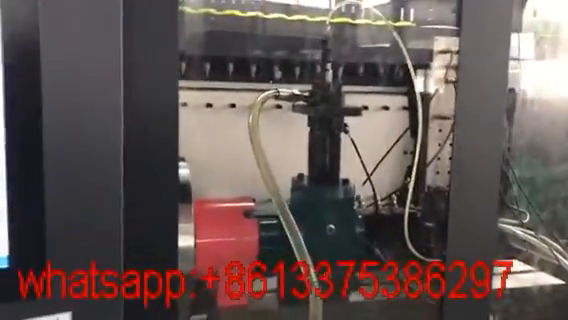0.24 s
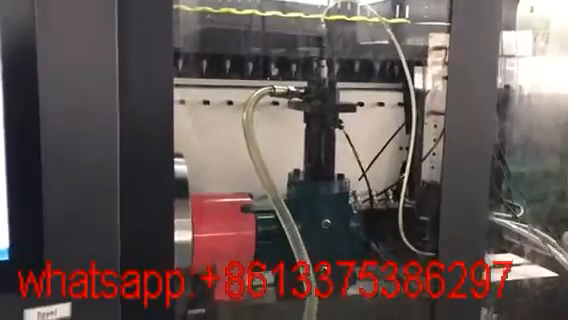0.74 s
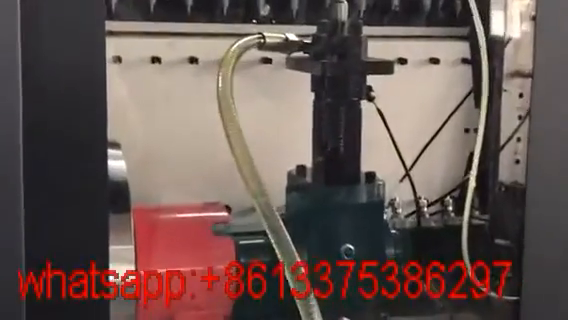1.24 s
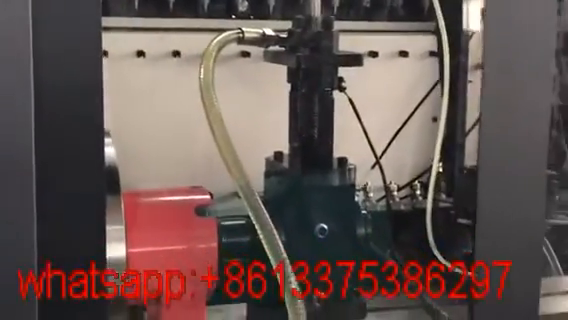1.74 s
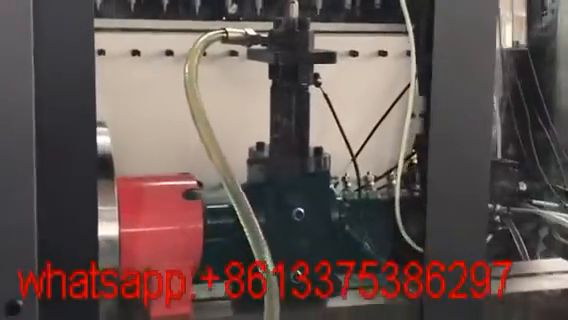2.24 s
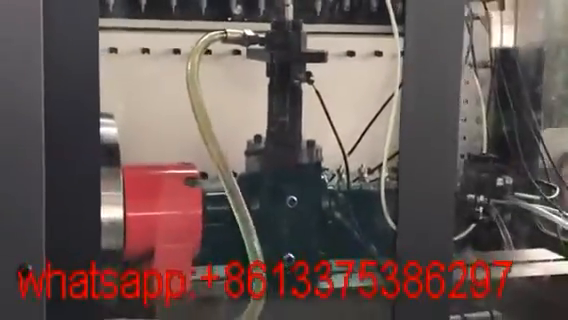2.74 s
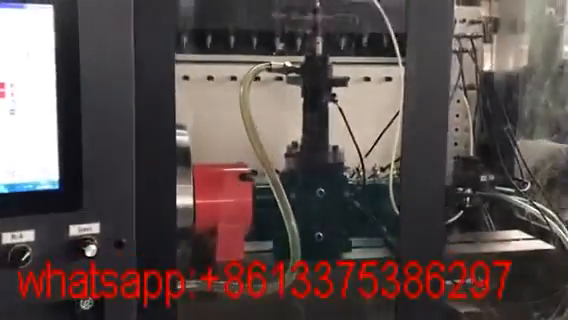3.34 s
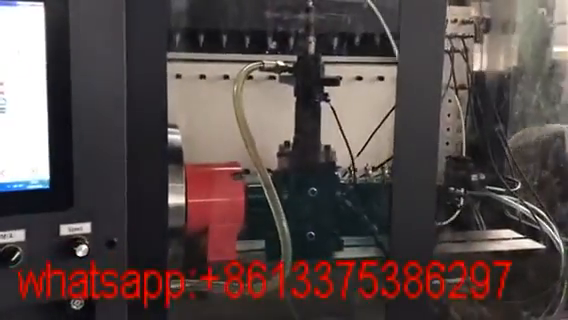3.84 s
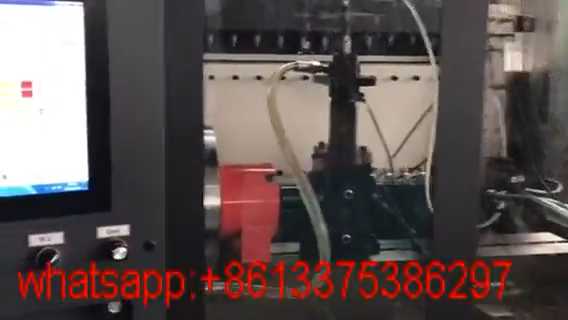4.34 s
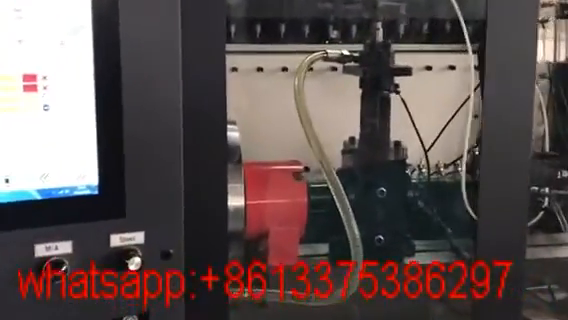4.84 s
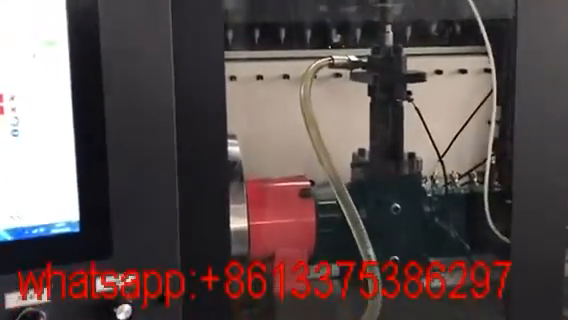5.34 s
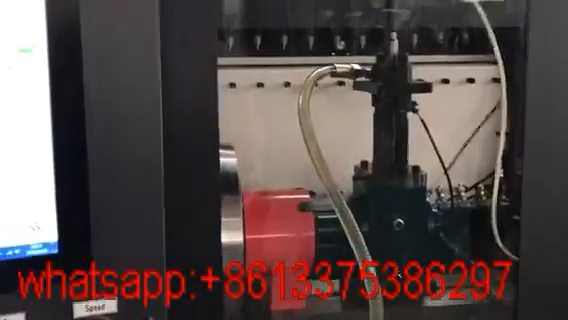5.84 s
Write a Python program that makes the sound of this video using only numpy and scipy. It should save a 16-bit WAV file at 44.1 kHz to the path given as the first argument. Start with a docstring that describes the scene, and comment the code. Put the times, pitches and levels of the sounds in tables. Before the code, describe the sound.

A diesel injection pump chugs fast and evenly on a test bench, then takes load after a second and knocks with loud, hard metallic blows.

```python
"""A single-plunger diesel injection pump turns at a steady speed on a test bench, heard from a step away.
Every cam turn shoves the frame (cam harmonics), rattles the tappet and spits oil (noise swelling once a turn).
After a second the pump takes load: each stroke is a run of impulses that rings casting and cabinet modes.
Gears, oil and rumble are coloured noise; the drive whine and valve whistle are wavering sines.
Later the oil valve shifts: a slightly lower whistle joins in. Two low bumps and short rushes of hiss pass."""
import sys
import numpy as np
from scipy import signal
from scipy.fft import rfft, irfft, next_fast_len
from scipy.io import wavfile
from scipy.ndimage import map_coordinates

SR = 44100
rng = np.random.default_rng(int(sys.argv[2]) if len(sys.argv) > 2 else 0)


def dump(signal):
    """Clip the signal to [-1, 1] and save it as 16-bit WAV at the path in sys.argv[1]."""
    limited = np.clip(np.atleast_2d(signal).T, -1, 1)
    pcm = np.round(limited * 32767).astype(np.int16)
    wavfile.write(sys.argv[1], SR, pcm)


N = 267673  # length [samples]

TURN_HZ, FIRST_TURN_S = 12.7267, .0345  # cam speed and start of the first turn
LOAD_ON_S, VALVE_SHIFT_S = 1.04, 2.32  # the pump takes load; the oil valve shifts
TOP_HZ = 15850  # band limit of the microphone

# single harder strokes: (time [s], level above the settled force [dB])
HARD_STROKES = [(5.063, 3), (5.378, 4)]
# settled force, extra force of the first strokes, its decay time, random spread
FORCE_DB, OVERSHOOT_DB, SETTLE_S, UNEVEN_DB = -1.58, 2.9, .6, 0.33


def stroke_force():
    """The first loaded strokes overshoot and settle; returns (time [s], level [dB]) rows."""
    times = turns()[turns() > LOAD_ON_S]
    overshoot_db = OVERSHOOT_DB * np.exp(-(times - LOAD_ON_S) / SETTLE_S)
    force_db = FORCE_DB + overshoot_db + UNEVEN_DB * rng.standard_normal(len(times))
    for s, extra_db in HARD_STROKES:
        nearest = np.argmin(np.abs(times - s))
        force_db[nearest] = FORCE_DB + extra_db
    return np.column_stack([times, force_db])


# contacts within one loaded stroke: (time into the turn [ms], relative level [dB])
STROKE_CONTACTS = [(5.04, -4.6), (12.33, -.6), (15.58, .9), (22.43, -6.4)]
# modes of the pump casting: (frequency [Hz], relative level [dB], t60 [s])
CASTING_MODES = [(830, -16, .033), (902, -8, .04), (1039, 4, .035), (1366, -5.5, .032)]


def casting_knocks(strokes, level_db, scatter_db):
    """Each loaded stroke is a quick run of hard contacts that ring the casting."""
    times, force_db = strokes.T
    back = step_back(times)
    blows = np.zeros(N)
    for ms, db in STROKE_CONTACTS:
        late, size = rng.standard_normal((2, len(times)))
        contact_times = times + (ms + .04 * late) / 1000
        # a step back costs 1.5 dB
        blows += taps(contact_times, amp(force_db) * amp(db - 1.5 * back + scatter_db * size))
    response = sum(amp(db) * mode(hz, t60) for hz, db, t60 in CASTING_MODES)
    casting = amp(level_db) * ring(blows, response)
    # the small casting radiates little bass
    return signal.sosfiltfilt(signal.butter(3, 500, "high", fs=SR, output="sos"), casting)


# modes of the cabinet panels: (frequency [Hz], relative level [dB], t60 [s], level change a step back [dB])
PANEL_MODES = [(577, -3.5, .24, 0), (712, -9, .17, 0), (761, 3.5, .24, -1), (830, 3, .2, 0),
               (883, -6, .19, 0), (979, 1.8, .2, -2), (1026, 15, .16, -3), (1048.7, 5.7, .2, -2),
               (1159, -3, .23, 7), (1206, -5.4, .21, 4), (1229, -2, .2, 1)]


def cabinet_panels(strokes, level_db, scatter_db):
    """The stroke reaches the panels about 16 ms into the turn; they ring on between strokes."""
    times, force_db = strokes.T
    back = step_back(times)
    panels = np.zeros(N)
    for k, (hz, db, t60, change_db) in enumerate(PANEL_MODES):
        # stepping back moves the listener through each panel's standing waves
        scatter = scatter_db * rng.standard_normal(len(times))
        sizes = amp(force_db) * amp(db + change_db * back + scatter)
        # neighbouring modes swing against each other
        panels += (-1) ** k * ring(taps(times + .01588, sizes), mode(hz, t60))
    return amp(level_db) * panels


def knocks(strokes, casting_db, cabinet_db, echo_db, scatter_db):
    """Casting and cabinet ring at each loaded stroke; dense reflections follow the casting."""
    casting = casting_knocks(strokes, casting_db, scatter_db)
    echo = amp(echo_db) * ring(casting, tail(t60=0.88))
    return casting + cabinet_panels(strokes, cabinet_db, scatter_db) + echo


# colour of the tappet rattle: (frequency [Hz], relative level per Hz [dB])
RATTLE_COLOUR = [(300, -31), (620, -27), (800, -0.5), (1030, 1), (1400, -2), (1630, -5.5), (1900, -5.5),
                 (2300, -7), (2700, -14), (3400, -12.5), (5000, -21.5), (12000, -52)]


def tappet(level_db, grain_db, step_db):
    """The tappet rattles at the top of every lift; it carries better to a listener a step back."""
    swell = bursts(start_ms=1, rise_ms=17, t60=.125, scatter_db=.7)
    clatter = machine_noise(repeat=0.52) * amp(grain_db * wobble(700)) * swell
    rattle = colour(steel(clatter, ring_db=-0.5, t60=0.14), RATTLE_COLOUR)
    return amp(level_db + step_db * step_back(clock())) * rattle


# relative levels of the cam's force on the frame: (multiple of the cam speed, relative level [dB])
FRAME_ORDERS = [(1, -44), (2, -64), (3, -56), (4, -29), (5, -36), (6, -13), (7, -23), (8, -26.5), (9, -3.5),
                (10, -10.5), (11, -8), (12, 1), (13, -6), (14, -12.5), (15, -15), (16, -27), (17, -1.5),
                (18, -5), (19, -11), (20, -2), (21, -11.5), (22, -5.5), (23, -12.5), (24, -43), (25, -8.5),
                (26, -4.5), (27, -30), (28, -6.5), (29, -6.5), (30, -3), (31, -5), (32, -18.5), (33, -11.5),
                (34, -26)]


def frame(level_db, shove_ms):
    """The cam shoves the frame once a turn; each order arrives with its own lag."""
    angle = 2 * np.pi * TURN_HZ * (clock() - FIRST_TURN_S - shove_ms / 1000)
    shake = sum(amp(db) * np.cos(round(order) * angle + rng.uniform(-1.6, 1.6)) for order, db in FRAME_ORDERS)
    return amp(level_db) * unit(shake)


# colour of the oil spray: (frequency [Hz], relative level per Hz [dB])
SPRAY_COLOUR = [(1500, -12), (3000, -4), (4100, 3.5), (5000, -4.5), (6000, 0.5), (7100, 0.5), (7700, -7.5),
                (9200, -7.5), (10400, -13), (11300, -9.5), (13000, -11), (15800, -17.5)]


def spray(level_db, grain_db, steel_db):
    """Oil spits through the nozzle at every stroke and rings the many small modes of the steel parts."""
    swell = bursts(start_ms=0.34, rise_ms=10.0, t60=0.17, scatter_db=2)
    jet = machine_noise(repeat=0.37) * amp(grain_db * wobble(1300)) * swell
    snap = rng.standard_normal(N) * bursts(start_ms=2.8, rise_ms=2.8, t60=0.013, scatter_db=0.5)
    ringing = unit(ring(snap, tail(t60=0.16)))
    return amp(level_db) * nearness(step_db=2.2) * colour(unit(jet) + amp(steel_db) * ringing, SPRAY_COLOUR)


# colour of the loose clatter: (frequency [Hz], relative level per Hz [dB])
SHUDDER_COLOUR = [(300, -18), (640, -3), (750, -0.5), (900, 7), (1060, -8.5), (1200, 0.5), (1550, -29),
                  (1750, -5.5), (2300, -7.5), (2600, -9), (3000, -28), (6000, -35)]


def shudder(strokes, level_db, grain_db):
    """Pipes and guards clatter loosely after each loaded stroke, more after a hard one."""
    force_db = curve(strokes, clock())
    clatter = machine_noise(repeat=0.49) * amp(grain_db * wobble(500) + 0.61 * force_db)
    swell = bursts(start_ms=4, rise_ms=10, t60=.15, scatter_db=1)
    return amp(level_db) * colour(clatter * swell * load(), SHUDDER_COLOUR)


# ring of the tappet spring: (frequency [Hz], relative level [dB], t60 [s])
SPRING_MODES = [(1760, 0, .1), (1950, -3, .04), (2200, -4, .07), (2330, -4, .04), (2560, -3, .03),
                (2900, 1, .04), (3150, 0, .04)]


def spring(level_db, load_db):
    """The tappet spring is shaken at every lift and rings freely at idle; load damps it."""
    shake = machine_noise(repeat=0.17) * bursts(start_ms=9.1, rise_ms=12, t60=0.052, scatter_db=0.5)
    coils = ring(shake, sum(amp(db) * mode(hz, t60) for hz, db, t60 in SPRING_MODES))
    return amp(level_db + load_db * load()) * unit(coils)


# colour of the gears: (frequency [Hz], relative level per Hz [dB])
GEARS_COLOUR = [(260, -46), (450, -12), (488, -7.5), (647, -10.5), (791, -11.5), (930, -1), (1050, 7),
                (1140, -1), (1480, -1), (1590, -4), (1790, -12.5), (1980, -6), (5000, -32.5), (6500, -48),
                (11000, -120)]


def gears(level_db):
    """Gears run without a break: partly repeating noise that rings small steel modes."""
    return amp(level_db) * colour(steel(machine_noise(repeat=0.32), ring_db=0.5, t60=0.2), GEARS_COLOUR)


# tones of the drive: (frequency [Hz], rms level at idle [dB], level change under load [dB])
DRIVE_TONES = [(102, -40, -12), (114.5, -41, -11), (216.5, -44, -10), (305.5, -41, -12), (407, -43, -12),
               (420, -41, -11), (433, -43, -12), (548, -47, 1), (647, -40, -9), (947.5, -32.5, -4.5),
               (1018, -37, -4), (1044, -40, -5), (1069, -37, -6), (1172, -41, -4), (1271, -39, -6),
               (1335, -40, -7), (1490, -43, -3), (1746, -45, -7), (1873, -47, -6)]


def drive_whine():
    """The drive hums and whines in steady lines that waver; most weaken under load."""
    return sum(tone(hz, db + change_db * load(), drift_hz=1.59, flutter_db=1.5)
               for hz, db, change_db in DRIVE_TONES)


# whistles of the oil valve: (frequency [Hz], relative rms level [dB], level change after the shift [dB])
VALVE_TONES = [(6076, -75, 26), (6126, -75.5, 25), (6240, -50, 1), (6331, -49.5, -3), (7210, -56, -1),
               (8140, -59, -1), (12785, -64, -2)]


def valve_whistle(level_db, wander_db, wanders_per_s):
    """The valve whistles at a slowly wandering level; its shift brings in a lower pair of lines."""
    whistle = sum(tone(hz, db + change_db * valve_shift(), drift_hz=12, flutter_db=2.5)
                  for hz, db, change_db in VALVE_TONES)
    return amp(level_db + wander_db * wobble(wanders_per_s)) * whistle


# colour of the circulating oil: (frequency [Hz], relative level per Hz [dB])
OIL_COLOUR = [(1760, -5.5), (3000, -1.5), (4070, -1), (4940, -9), (5790, -4.5), (6040, -18), (6290, -5),
              (6520, -5), (7080, 0.5), (7750, -8), (9280, -8.5), (10400, -17), (12900, -15), (15200, -29),
              (15700, -33)]


def circulating_oil(level_db, shift_db):
    """Oil hisses without a break and rings small steel modes; the valve shift weakens it."""
    hiss = colour(steel(machine_noise(repeat=0.29), ring_db=-2.0, t60=0.18), OIL_COLOUR)
    return amp(level_db + shift_db * valve_shift() + .5 * wobble(3.06)) * hiss


# colour of the motor rumble: (frequency [Hz], relative level per Hz [dB])
RUMBLE_COLOUR = [(20, -36), (45, -31), (65, -9), (95, -14), (170, 1), (300, -9), (420, -8.5), (470, -10),
                 (650, -9), (1200, -8), (4000, -48)]


def motor_rumble(level_db):
    """The motor rumbles as low noise of gently wandering level."""
    return amp(level_db + wobble(5.65)) * colour(rng.standard_normal(N), RUMBLE_COLOUR)


# dull bumps on the bench: (time [s], relative level [dB], frequency [Hz])
BENCH_BUMPS = [(4.905, -19, 135), (5.344, -16.5, 105)]


def bumps():
    """A soft push, 5 ms long, sets off one low resonance."""
    out = np.zeros(N)
    push = np.hanning(SR // 200)
    for s, db, hz in BENCH_BUMPS:
        thud = np.convolve(mode(hz, t60=0.2), push / push.sum())
        out += amp(db) * ring(taps(np.array([s]), [1.]), thud)
    return out


# brief rushes of hiss: (time of the peak [s], peak level [dB], time to fall to 1/e [s], centre [Hz])
HISS_RUSHES = [(4.01, -26.5, 0.018, 4950), (4.052, -32, 0.04, 4900), (5.16, -45, 0.055, 13000)]


def rushes():
    """Band-shaped noise swells and fades in a short bell curve."""
    t, out = clock(), np.zeros(N)
    for s, db, length, hz in HISS_RUSHES:
        band = [(hz / 8, -12), (hz / 2, 3), (hz, 0), (hz * 2, -9), (hz * 3, -22)]
        hiss = colour(rng.standard_normal(N), band)
        out += amp(db) * np.exp(-((t - s) / length) ** 2) * hiss
    return out


# where the listener stands: (time [s], position [steps back; negative leans in])
LISTENER_STANCE = [(1.1, -0.28), (2.25, -0.22), (2.9, 1), (4, 1), (4.8, 0.45), (5.4, -0.13), (6, -0.37)]


def step_back(at):
    """How far back the listener stands at the given times."""
    return curve(LISTENER_STANCE, at)


def nearness(step_db):
    """Direct treble falls as the listener steps back."""
    return amp(-step_db * step_back(clock()))


def load():
    """0 while the pump idles, 1 once it delivers."""
    return np.clip((clock() - LOAD_ON_S) / .02, 0, 1)


def valve_shift():
    """0 before the oil valve shifts, 1 after."""
    return np.clip((clock() - VALVE_SHIFT_S) / .02, 0, 1)


def turns():
    """The start of every cam turn."""
    return np.arange(FIRST_TURN_S, N / SR, 1 / TURN_HZ)


def machine_noise(repeat):
    """Noise of which a share of the power comes back alike on every turn."""
    share = np.clip(repeat, 0, 1)
    pattern = np.resize(rng.standard_normal(round(SR / TURN_HZ)), N)
    return np.sqrt(share) * pattern + np.sqrt(1 - share) * rng.standard_normal(N)


def bursts(start_ms, rise_ms, t60, scatter_db):
    """An envelope that swells and dies once a turn, at rms 1."""
    t, times = np.arange(SR // 2) / SR, turns()
    power = np.clip(t * 1000 / rise_ms, 0, 1) ** 2 * np.exp(-2 * np.log(1000) * t / t60)
    sizes = amp(scatter_db * rng.standard_normal(len(times))) ** 2
    blows = taps(times + start_ms / 1000, sizes)
    # overlapping bursts add in power
    return unit(np.sqrt(np.abs(ring(blows, power))))


def tone(hz, db, drift_hz, flutter_db):
    """A line that wavers in pitch and level."""
    phase = 2 * np.pi * (np.cumsum(hz + drift_hz * wobble(25)) / SR + rng.random())
    return np.sqrt(2) * amp(db + flutter_db * wobble(13)) * np.sin(phase)


def steel(x, ring_db, t60):
    """x with the ring of many small steel modes on top, at rms 1."""
    return unit(unit(x) + amp(ring_db) * unit(ring(x, tail(t60))))


def mode(hz, t60):
    """One dying resonance; the air follows the speed of the surface."""
    t = np.arange(SR // 2) / SR
    decay = np.exp(-np.log(1000) * t / t60)
    onset = 1 - np.exp(-t / .001)
    swing = np.sin(2 * np.pi * hz * t) * decay * onset
    return np.gradient(swing) * SR / (2 * np.pi * hz)


def tail(t60):
    """Dense dying reflections of energy 1."""
    t = np.arange(SR // 2) / SR
    echo = rng.standard_normal(len(t)) * np.exp(-np.log(1000) * t / t60)
    return echo / np.linalg.norm(echo)


def ring(x, response):
    """x played through an impulse response."""
    return signal.fftconvolve(x, response)[:N]


def taps(times, sizes):
    """One impulse at each time."""
    return np.bincount(np.round(np.abs(times) * SR).astype(int), sizes, N)[:N]


def colour(x, points):
    """x shaped by (frequency [Hz], level [dB]) points, at rms 1."""
    size = next_fast_len(N + 8192)
    hz, db = np.transpose(points)
    log_hz = np.log(np.fft.rfftfreq(size, 1 / SR) + 1)
    gain = amp(np.interp(log_hz, np.log(hz), db))
    return unit(irfft(rfft(x, size) * gain, size)[:N])


def wobble(rate):
    """A smooth random curve, rate knots a second."""
    knots = rng.standard_normal(int(N * rate / SR) + 4)
    return map_coordinates(knots, [clock() * rate], mode="nearest")


def curve(rows, at):
    """(time [s], value) rows joined by straight lines."""
    return np.interp(at, *np.transpose(rows))


def clock():
    """The time of every sample in seconds."""
    return np.arange(N) / SR


def unit(x):
    """x at rms 1."""
    return x / np.sqrt(np.mean(x ** 2) + 1e-20)


def amp(db):
    """Decibels to gain."""
    return 10 ** (np.asarray(db) / 20)


def scene():
    """The pump on its running bench."""
    strokes = stroke_force()
    pump = knocks(strokes, casting_db=-8.0, cabinet_db=-26.0, echo_db=-17.5, scatter_db=.5)
    pump += tappet(level_db=-28.5, grain_db=1.5, step_db=1.1)
    pump += frame(level_db=-29.5, shove_ms=21)
    pump += spray(level_db=-36.5, grain_db=1, steel_db=-5.0)
    pump += shudder(strokes, level_db=-29.5, grain_db=0.5)
    pump += spring(level_db=-34.5, load_db=-5.5)
    bench = gears(level_db=-25.5) + drive_whine()
    bench += valve_whistle(level_db=1.5, wander_db=1.6, wanders_per_s=2.5)
    bench += circulating_oil(level_db=-35.5, shift_db=-1) + motor_rumble(level_db=-33)
    return (pump + bench + bumps() + rushes())[None]


def record(dry):
    """The microphone keeps nothing above its band limit."""
    size = next_fast_len(N + 8192)
    in_band = np.fft.rfftfreq(size, 1 / SR) < TOP_HZ
    return irfft(rfft(dry, size) * in_band, size)[:, :N]


dry = scene()
out = record(dry)
dump(out)
```